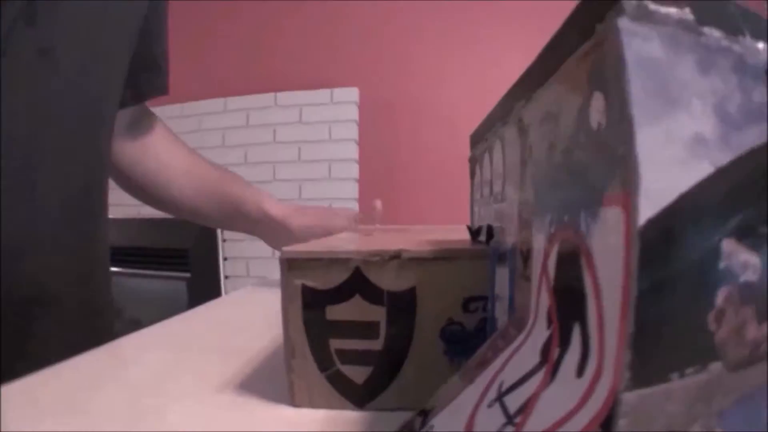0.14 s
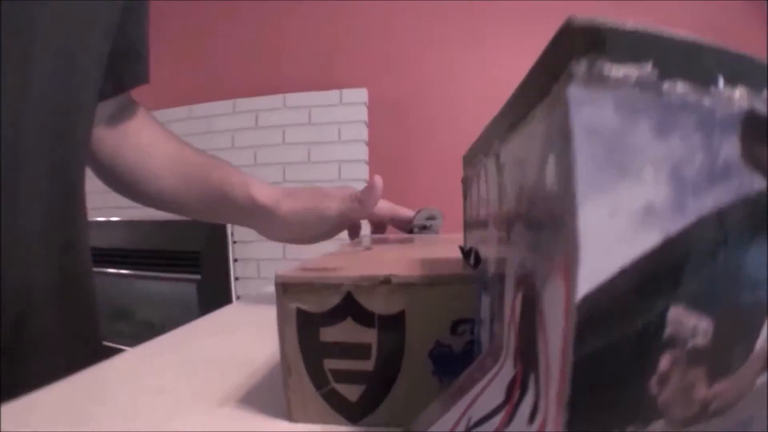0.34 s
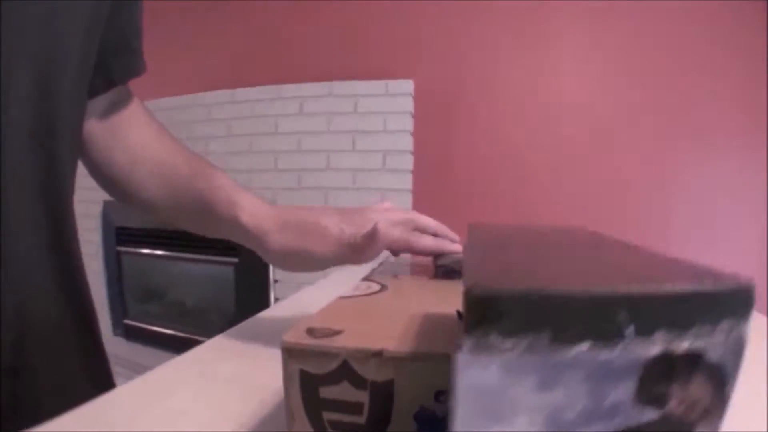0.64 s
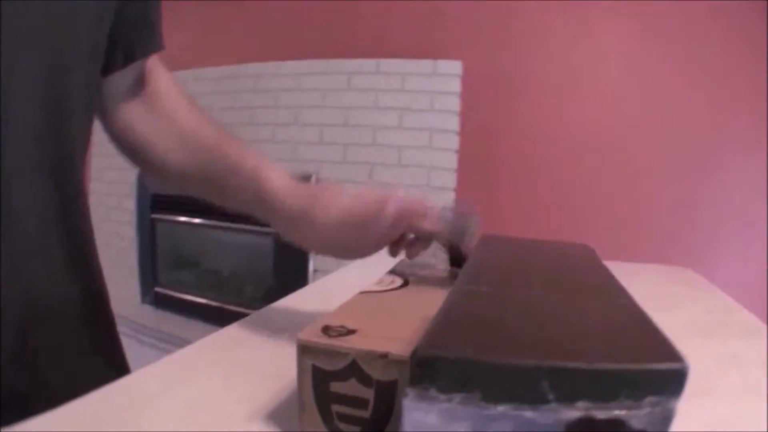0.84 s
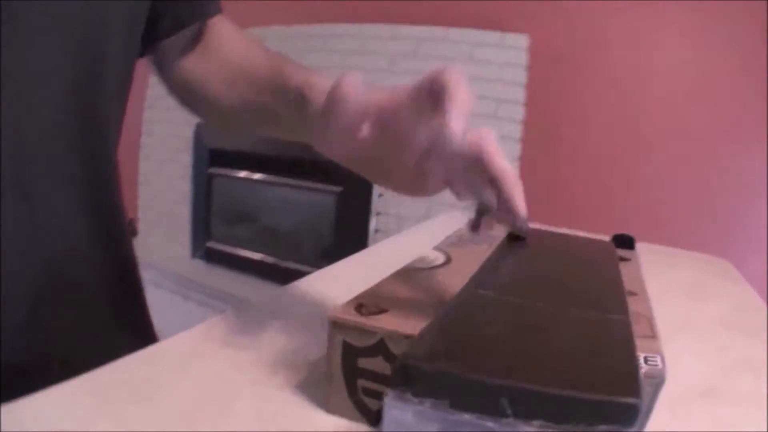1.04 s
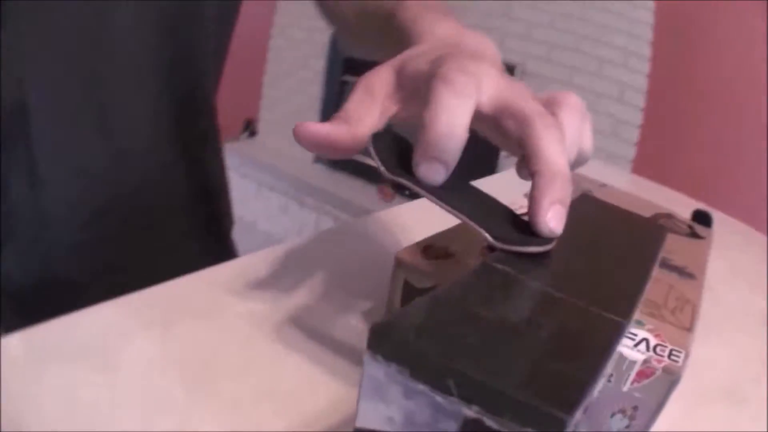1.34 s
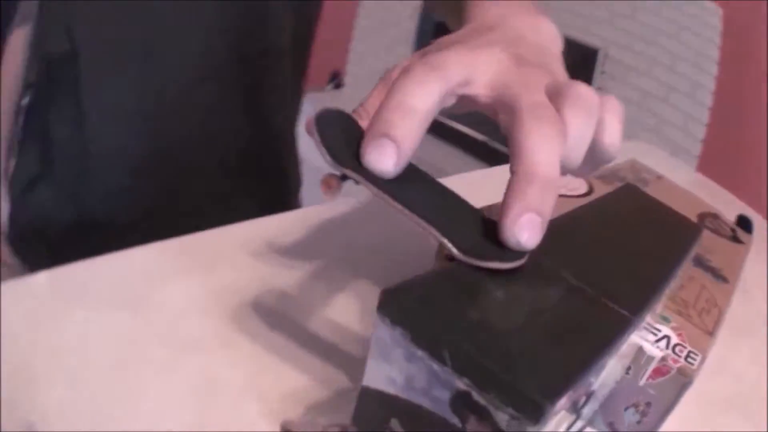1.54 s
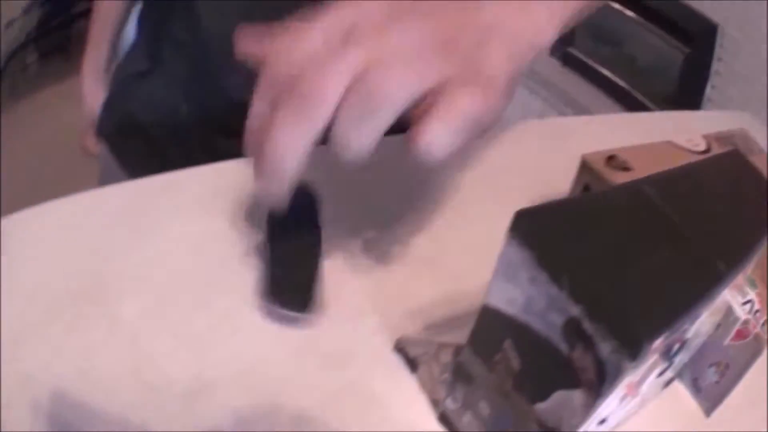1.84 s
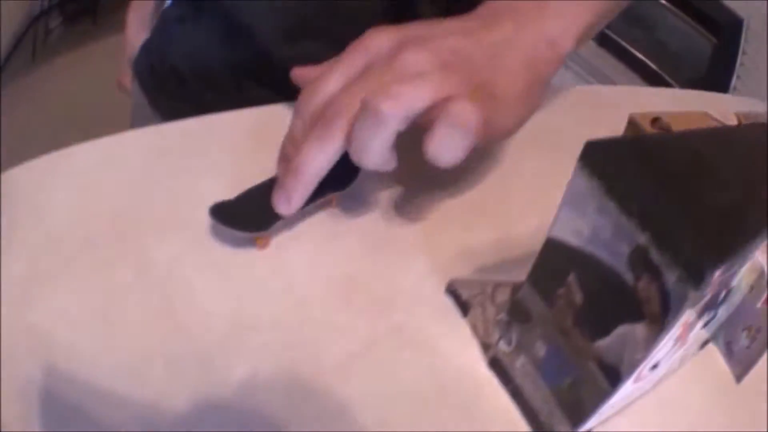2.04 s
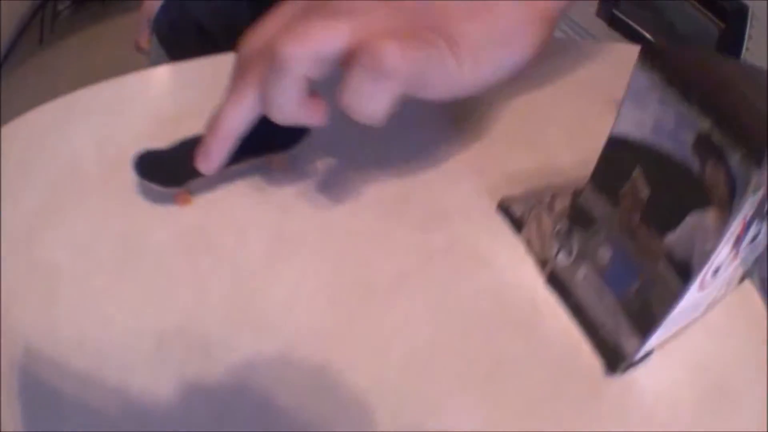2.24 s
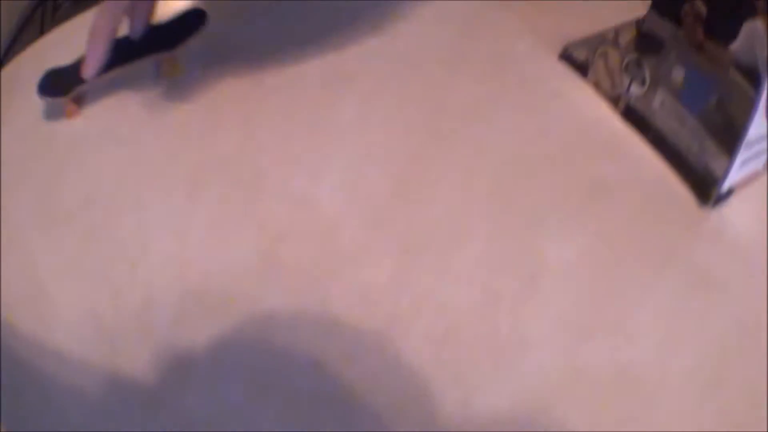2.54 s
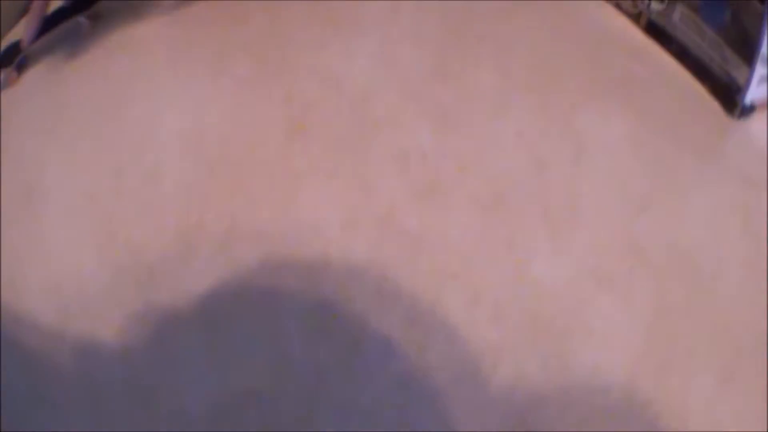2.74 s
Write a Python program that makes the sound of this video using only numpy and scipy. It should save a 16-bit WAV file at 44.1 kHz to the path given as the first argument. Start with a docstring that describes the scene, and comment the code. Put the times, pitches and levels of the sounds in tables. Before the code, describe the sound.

Tiny skateboard rattles across hollow boxes, scrapes a ledge, then lands with sharp clacks and skids

```python
"""A toy skateboard rolls over a table, two hollow cardboard boxes and a stone-like ledge in a living room.
Wheels and grinding axle are gritty noise shaking each surface into its resonances and its treble hiss.
Landings, pops and flips clack as cracks of noise with a short deck ring; after the last landing
the wheels skid as filtered noise and squeak as fuzzy gliding whistles.
A low table bump, early reflections, a short room tail and a soft noise floor lie underneath."""
import sys
import numpy as np
from scipy import signal
from scipy.io import wavfile
from scipy.ndimage import uniform_filter1d, map_coordinates

SR = 44100
rng = np.random.default_rng(int(sys.argv[2]) if len(sys.argv) > 2 else 0)


def output_pcm(signal):
    """Save a mono or channel-first signal as 16-bit PCM at the path in sys.argv[1].

    Samples are clipped to [-1, 1] before scaling.
    """
    pcm = np.clip(np.atleast_2d(signal).T, -1, 1) * 32767
    wavfile.write(sys.argv[1], SR, np.round(pcm).astype(np.int16))


def boost_factor(decibels):
    """Convert a level in decibels to a linear amplitude factor."""
    exponent = np.asarray(decibels, float) / 20
    return 10 ** exponent


N = 127890  # length in samples

# Ring tables: each row: resonance in Hz, width in Hz, level in dB against the smooth spectrum.
# For every surface but the grinding axle, ring_db is added to that level.
# Hiss and other spectrum tables: each row: frequency in Hz, relative level in dB.

# Wheels on the far end of the table, then on the table after the last landing.
# Each row: time in seconds, rumble in dB, wheel hiss in dB.
TABLE_ROLLS = [
    [(0, -48.5, -51.5), (.245, -49, -56.5)],
    [(2.019, -30.5, -56), (2.05, -55, -35), (2.105, -49.5, -38.5), (2.28, -45.5, -46.5), (2.54, -43.5, -46),
     (2.66, -45.5, -49.5), (2.9, -46, -50)],
]
FAR_TABLE_RING = [(503, 140, -10), (1220, 110, -8.5)]
TABLE_RING = [(456, 25, -1.5), (715, 52, -2.5), (860, 16, 7), (1155, 150, 0.5)]
TABLE_HISS = [(2000, -2), (3200, -5), (4200, 7), (5600, -10.5), (16000, -22)]
# Wheels on the ramp box, on the flat box, then the pop off its edge.
# Each row: time in seconds, rumble in dB, wheel hiss in dB.
BOX_ROLLS = [
    [(.246, -25.5, -31), (.312, -27, -42), (.328, -26, -32), (.365, -31, -47.5), (.54, -35.5, -46),
     (.74, -48, -64)],
    [(.741, -29, -39), (.83, -31, -55.5), (.96, -24.5, -46), (1.01, -37.5, -59), (1.075, -43.5, -62)],
    [(1.079, -25, -42), (1.13, -36, -51), (1.2, -39.5, -65), (1.267, -49, -57)],
]
RAMP_BOX_RING = [(270.7, 14, -3.5), (532, 150, -6), (719, 45, 0), (1622, 123, -8.5)]
FLAT_BOX_RING = [(420, 110, 4.5), (906, 70, -1), (1583, 43, -7.5), (2120, 53, -14)]
BOX_EDGE_RING = [(273, 73, 7.4), (337, 81, 10.4), (533, 51, 9.5), (866, 92, 2.4)]
BOX_HISS = [(1100, -3.5), (3300, 3.5), (4800, -1.5), (16000, -28)]
# Wheels knocking the hollow boxes, one list a stretch. Each row: time in seconds, energy in dB.
BOX_KNOCKS = [
    [(.249, -3), (.3225, -5.5)],
    [(.742, -7.5), (.885, -1.5), (.968, 3)],
    [(1.081, 2), (1.098, -2)],
]
# Board balanced, then ground along the ledge. Each row: time in seconds, rumble in dB, grind in dB.
LEDGE_ROLLS = [
    [(1.268, -35, -39.5), (1.34, -43.5, -42.5), (1.4, -49, -56.5), (1.59, -51, -59)],
    [(1.594, -43.5, -50), (1.645, -41.5, -39.5), (1.672, -51, -50), (1.685, -36, -40.5), (1.722, -49, -49),
     (1.75, -38.5, -40), (1.85, -51.5, -40.5), (1.878, -41, -39.5), (1.89, -74, -90)],
]
BALANCE_RING = [(159, 48, 0), (875, 69, -3.5)]  # board resting on one axle
LEDGE_RING = [(142, 60, 0.44), (486, 53, 0.41), (1000, 113, 0.28)]
LEDGE_HISS = [(1200, -3), (4400, 4.5), (16000, -13)]
AXLE_GRIND_RING = [(2000, 120, -0.5), (3410, 210, 2), (4220, 400, 4)]  # axle on stone
RUMBLE_SPECTRUM = [(70, -52), (230, -9), (900, -9), (2400, -25.5), (4000, -77)]

# Clacks of deck and wheels. Each row: start in seconds, peak of the crack in dB, centre in Hz.
CLACKS = [(0.608, -21.5, 2480), (0.753, -17, 1950), (1.08, -20.5, 4840), (1.2685, -19.5, 4630),
          (1.275, -16.5, 8300), (1.4589, -26, 3330), (1.594, -28, 3280), (1.621, -29, 2270),
          (1.6446, -26.5, 3160), (1.6795, -32, 1880), (1.7405, -30, 2700), (1.786, -21.5, 4040),
          (1.8002, -21, 4400), (1.8099, -21, 4640), (1.821, -19.5, 4300), (1.8247, -17, 4620),
          (1.8752, -23.5, 2300), (2.0182, -14, 4870), (2.0305, -20, 4900), (2.038, -18, 4520),
          (2.11, -22.5, 2660), (2.1173, -14.5, 5150), (2.539, -31, 9160), (2.6186, -22.5, 8640)]
# Deck ring. Each row: frequency in Hz, level in dB against the struck part, t60 in seconds.
DECK_MODES = [(2158, -12, 0.035)]
# Wheels sliding sideways. Each row: time in seconds, level in dB.
SKID_LEVEL = [(2.121, -30.5), (2.19, -30), (2.3, -51.5)]
SKID_HISS = [(100, -34), (300, -5), (1200, -6), (2500, -17.5), (3300, -5), (6700, -6.5), (7500, -15),
             (16000, -38)]
# Squeaks of a rubbing wheel. Each row: start in seconds, length in seconds, level in dB ahead of
# the fade in and out, first pitch in Hz, last pitch in Hz, width in Hz.
SQUEAKS = [(2.128, .022, -29, 6200, 6700, 150), (2.312, .045, -28, 3650, 3800, 220)]
# Low bump of the table: start in seconds, length in seconds, pitch in Hz, peak level in dB.
TABLE_BUMP = (.08, .17, 68, -52)

# Left over right balance. Each row: time in seconds, difference in dB.
PAN = [(0, 2), (2.9, -1)]
# Room decay. Each row: frequency in Hz, t60 in seconds.
ROOM_T60 = [(200, 0.14), (4000, 0.13), (12000, 0.22)]
# Room tail. Each row: frequency in Hz, energy in dB against the dry board.
ROOM_WET = [(100, -26.5), (500, -4.5), (10000, -2)]
# Noise floor spectrum. Each row: frequency in Hz, relative level in dB.
FLOOR_SPECTRUM = [(40, -8), (180, -8), (900, 0), (2100, -3.5), (16000, -16.5)]

LUMPS_DB, LUMP_S = 1.8, 0.012  # the load on the wheels wavers: rms depth, smoothing span
WANDER, WANDER_S = 0.04, 0.03  # resonances drift by this rms share as the wheels move along
CRACK_S, CRACK_RISE_S = 0.0015, 0.0006  # decay and rise time constants
CRACK_WIDTH = 0.54  # the crack's shoulders lie at its centre times and over this share
DECK_DB = -5  # peak of the ring against the crack
STRUCK_T60_S = 0.011  # the struck part rings at the centre of its clack
SQUEAK_OCTAVE_DB = -13
WIDE_DB, WIDE_S = -4.5, 0.0068  # early reflections: gain, decay time constant
FLOOR_DB = -55
LOW_CUT_HZ, EDGE_HZ = 60, 16300  # bass corner, treble edge


def roll(rows, ring, hiss, ring_db, grains_per_s, spread_db, grind=(), knocks=()):
    """Wheels shake and knock the surface into its resonances and hiss on its grain."""
    lumps = evened(boost_factor(LUMPS_DB * slow(LUMP_S)))
    shake = lumps * level(rows, column=1) * grit(900, 2.8, 1.05)
    for start, db in knocks:
        add(shake, start, boost_factor(np.array([db])))  # a knock is a single-sample impulse
    rumble = signal.oaconvolve(shake, response(RUMBLE_SPECTRUM, ring, ring_db))
    rub = lumps * level(rows, column=2) * grit(grains_per_s, spread_db, 0.7)
    rubbed = signal.oaconvolve(rub, response(hiss, grind))
    return wander((rumble + rubbed)[:N])


def grit(per_s, spread_db, smooth):
    """Surface grain: tiny bumps of uneven size over a smooth rub, at rms 1."""
    size_db = spread_db * np.minimum(rng.exponential(1, N), 3.5)
    size = boost_factor(size_db) * rng.choice([-1., 1.], N)
    bumps = size * (rng.random(N) < per_s / SR)
    return evened(evened(bumps) + smooth * rng.standard_normal(N))


def wander(x):
    """Reads x a little faster or slower, so that its resonances drift."""
    shift = slow(WANDER_S)
    shift_samples = WANDER * shift / np.std(np.diff(shift))
    return map_coordinates(x, [np.arange(N) + shift_samples], order=3)


def clack(start, db, hz):
    """A crack of noise around its centre, with short decaying rings of the deck and the struck part."""
    t = np.arange(0, 0.1, 1 / SR)
    spectrum = [(hz / 8, -24), (hz * CRACK_WIDTH, -8), (hz, 0), (hz / CRACK_WIDTH, -10), (hz * 5, -32)]
    shape = np.exp(-t / CRACK_S) * (1 - np.exp(-t / CRACK_RISE_S))
    burst = rng.standard_normal(len(t)) * shape
    crack = signal.oaconvolve(burst, response(sorted(spectrum), size=512))[:len(t)]
    deck = np.zeros(len(t))
    for mode_hz, mode_db, t60 in DECK_MODES + [(hz, 0, STRUCK_T60_S)]:
        detuned_hz = mode_hz * (1 + WANDER * rng.standard_normal())
        deck += boost_factor(mode_db - 60 * t / t60) * np.sin(2 * np.pi * detuned_hz * t)
    return start, boost_factor(db) * (crack / np.abs(crack).max() + boost_factor(DECK_DB) * deck / np.abs(deck).max())


def skid():
    """Wheels sliding sideways: dense grit through the skid's hiss spectrum."""
    rub = level(SKID_LEVEL, column=1) * grit(3000, 6.0, 1.1)
    return signal.oaconvolve(rub, response(SKID_HISS))[:N]


def squeak(start, length, db, from_hz, to_hz, width_hz):
    """A rubbing wheel's gliding whistle and octave, made fuzzy by narrow noise."""
    u = np.arange(0, length, 1 / SR) / length
    turn = np.exp(2j * np.pi * np.cumsum(from_hz + (to_hz - from_hz) * u) / SR)
    r = np.exp(-np.pi * width_hz / SR)
    noise = rng.standard_normal((len(u) + 400, 2)) @ [1, 1j]
    fuzz = signal.lfilter([1], [1, -2 * r, r * r], noise)[400:]  # skip the filter's build-up
    whistle = (fuzz * (turn + boost_factor(SQUEAK_OCTAVE_DB) * turn ** 2)).real
    return start, boost_factor(db) * np.sin(np.pi * u) * evened(whistle)


def bump():
    """The low bump of the table: a sine swelling and fading over half a sine arch."""
    t = np.arange(N) / SR
    start, length, hz, db = TABLE_BUMP
    arch = np.sin(np.pi * np.clip((t - start) / length, 0, 1))
    return boost_factor(db) * arch * np.sin(2 * np.pi * hz * t)


def nearest_reflections(board):
    """The two microphones hear the nearest reflections differently: a decaying blur, opposite in sign."""
    blur = rng.standard_normal(1024) * np.exp(-np.arange(1024) / (WIDE_S * SR))
    bright = np.diff(board, prepend=0)  # tilts towards the treble
    wide = boost_factor(WIDE_DB) * signal.oaconvolve(bright, blur / np.linalg.norm(blur))[:N]
    return np.array([wide, -wide])


def room(x):
    """Sparse taps of random sign, each band dying at its own speed, different left and right."""
    taps = np.zeros((2, SR // 2))
    at = np.arange(60, SR // 2 - 20, 20)
    at = at + rng.integers(0, 20, (2, len(at)))
    np.put_along_axis(taps, at, rng.choice([-1., 1.], at.shape), 1)
    hz, t, z = signal.stft(taps, SR, nperseg=256)
    t60 = np.interp(hz, *np.transpose(ROOM_T60))[:, None]
    wet = boost_factor(np.interp(hz, *np.transpose(ROOM_WET)))[:, None] / np.sqrt(t60)
    tail = signal.istft(z * boost_factor(-60 * t / t60) * wet, SR, nperseg=256)[1]
    tail = tail / np.sqrt(2205 / (6 * np.log(10)))  # 2205 taps a second, decaying over t60
    return signal.fftconvolve(x[None], tail, axes=1)[:, :N]


def noise_floor():
    """Steady shaped noise, partly shared by left and right."""
    air = rng.standard_normal((3, N))
    both = 0.5 * air[2] + 0.8 * air[:2]
    return boost_factor(FLOOR_DB) * signal.oaconvolve(both, response(FLOOR_SPECTRUM)[None], axes=1)[:, :N]


def response(points, peaks=(), peaks_db=0, size=4096):
    """Causal impulse response of energy 1: a smooth spectrum with resonances on top."""
    hz = np.abs(np.fft.fftfreq(size, 1 / SR))
    f, db = np.transpose(points)
    power = boost_factor(2 * np.interp(np.log(hz + 1), np.log(f + 1), db))
    for centre, width, peak_db in peaks:
        power = power + boost_factor(2 * (peak_db + peaks_db)) / (1 + (2 * (hz - centre) / width) ** 2) ** 2
    log_gain = np.log(power + 1e-10) / 2
    h = np.fft.ifft(np.exp(np.conj(signal.hilbert(log_gain)))).real  # minimum phase
    if np.sum(h[:size // 2] ** 2) <= np.sum(h[size // 2:] ** 2):
        h = np.roll(h[::-1], 1)  # turn it so that the energy comes first
    return h[:size // 2] / np.linalg.norm(h[:size // 2])


def level(rows, column):
    """Gain over time from a dB curve, silent outside it."""
    rows = np.array(rows)
    return boost_factor(np.interp(np.arange(N) / SR, rows[:, 0], rows[:, column], left=-200, right=-200))


def slow(span_s):
    """Smooth random wobble of rms 1: noise averaged twice over the span."""
    span = round(span_s * SR)
    return evened(uniform_filter1d(uniform_filter1d(rng.standard_normal(N), span), span))


def evened(x):
    """Scales a sound to rms 1."""
    return x / np.sqrt(np.mean(x ** 2) + 1e-20)


def add(mix, start, sound):
    """Lays a sound into the mix at its start in seconds."""
    part = mix[round(start * SR):][:len(sound)]
    part += sound[:len(part)]


def scene():
    """Sums the board's sounds, then sets them in the stereo room over the noise floor."""
    board = bump()
    for rows, ring in zip(TABLE_ROLLS, (FAR_TABLE_RING, TABLE_RING)):
        board += roll(rows, ring, TABLE_HISS, ring_db=8, grains_per_s=1200, spread_db=3.5)
    for rows, ring, knocks in zip(BOX_ROLLS, (RAMP_BOX_RING, FLAT_BOX_RING, BOX_EDGE_RING), BOX_KNOCKS):
        board += roll(rows, ring, BOX_HISS, ring_db=3.0, grains_per_s=1900, spread_db=3.0, knocks=knocks)
    for rows, ring in zip(LEDGE_ROLLS, (BALANCE_RING, LEDGE_RING)):
        board += roll(rows, ring, LEDGE_HISS, ring_db=7.5, grains_per_s=1600, spread_db=5.0,
                      grind=AXLE_GRIND_RING)
    board += skid()
    for row in SQUEAKS:
        add(board, *squeak(*row))
    for row in CLACKS:
        add(board, *clack(*row))
    half_pan = np.interp(np.arange(N) / SR, *np.transpose(PAN)) / 2
    direct = board * boost_factor(np.array([half_pan, -half_pan]))
    return direct + nearest_reflections(board) + room(board) + noise_floor()


def top_cut(x):
    """Nothing passes above the cut-off."""
    return signal.sosfilt(signal.butter(12, 16810, fs=SR, output="sos"), x)


def record(dry):
    """The microphone rolls off the deepest bass; a steep low-pass limits the highest treble."""
    trimmed = signal.sosfilt(signal.cheby2(12, 60, EDGE_HZ, fs=SR, output="sos"), dry)
    mix = signal.lfilter(*signal.butter(2, LOW_CUT_HZ, "high", fs=SR), trimmed)
    return top_cut(mix)


dry = scene()
out = record(dry)
output_pcm(out)
```